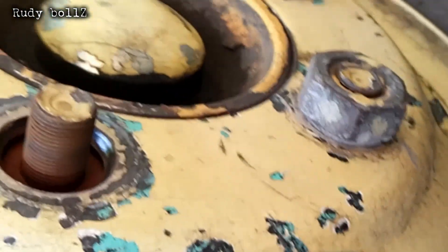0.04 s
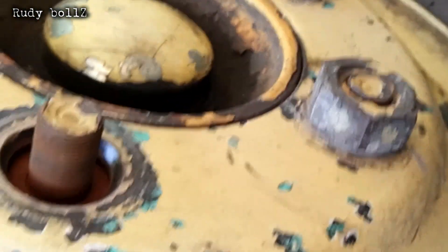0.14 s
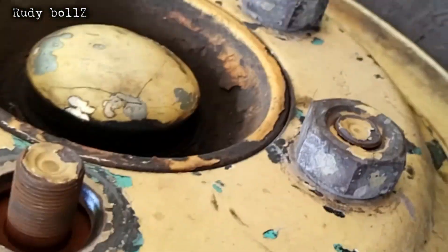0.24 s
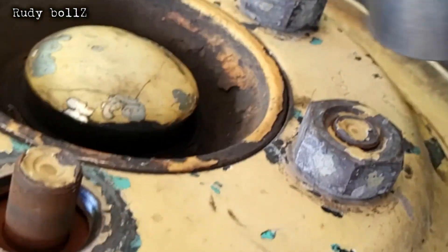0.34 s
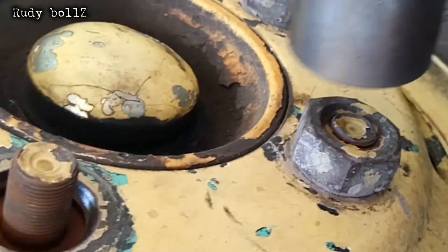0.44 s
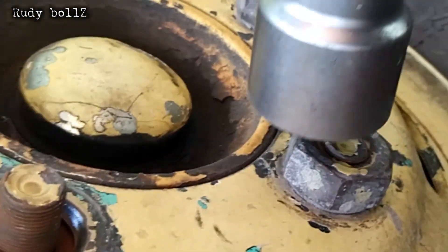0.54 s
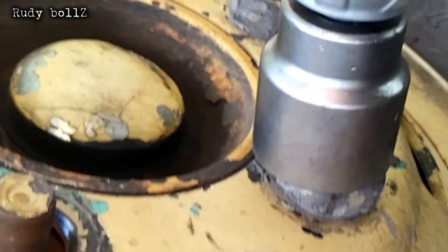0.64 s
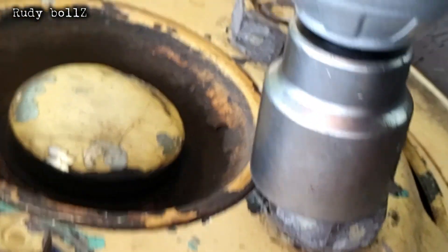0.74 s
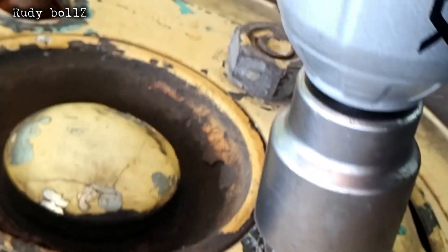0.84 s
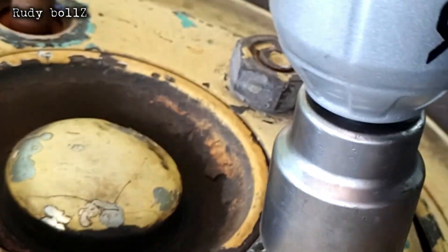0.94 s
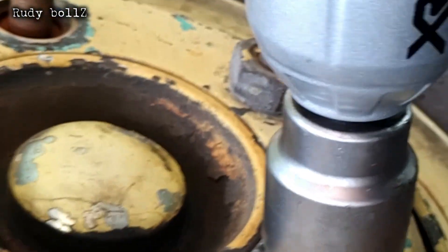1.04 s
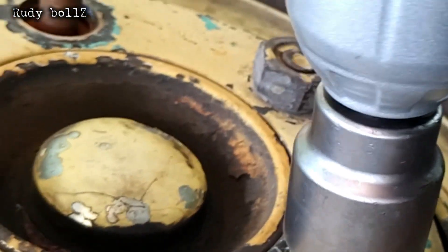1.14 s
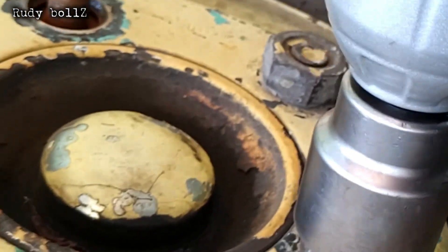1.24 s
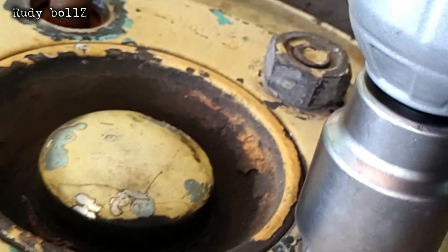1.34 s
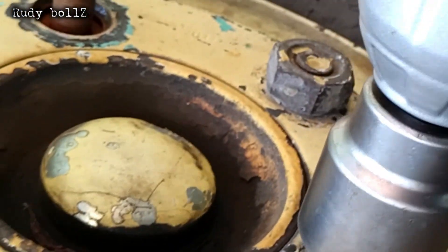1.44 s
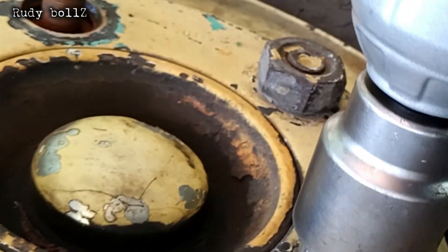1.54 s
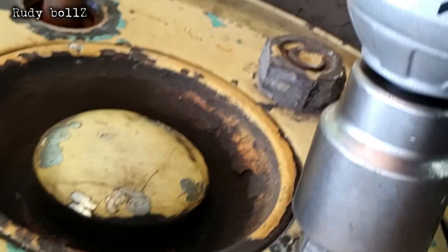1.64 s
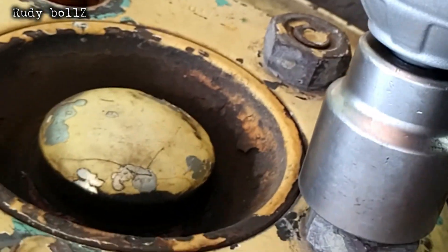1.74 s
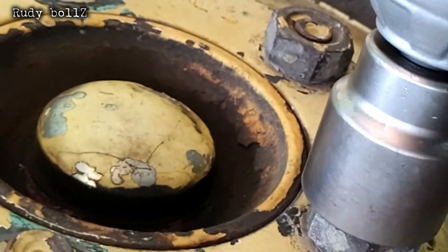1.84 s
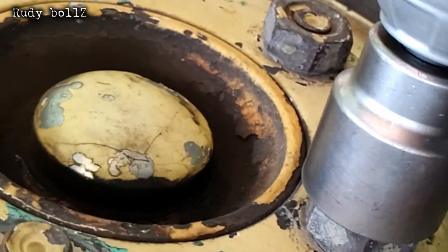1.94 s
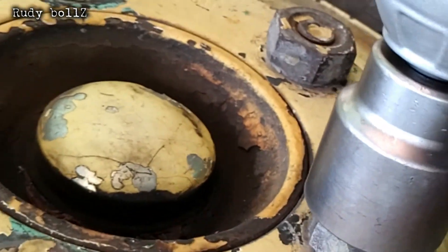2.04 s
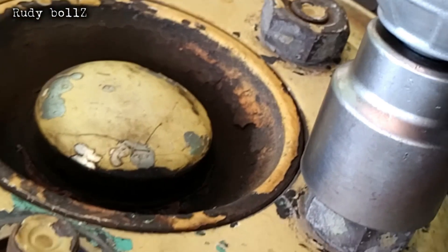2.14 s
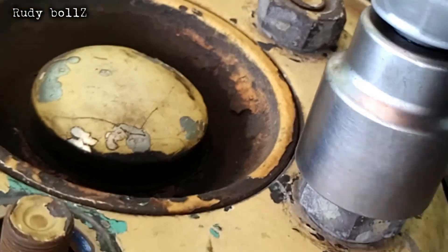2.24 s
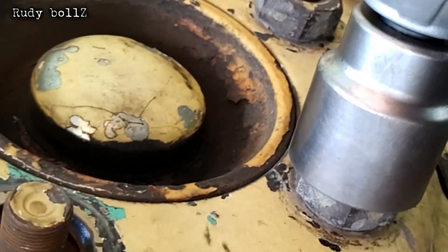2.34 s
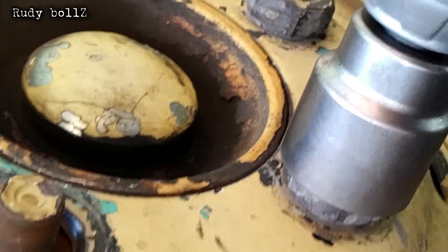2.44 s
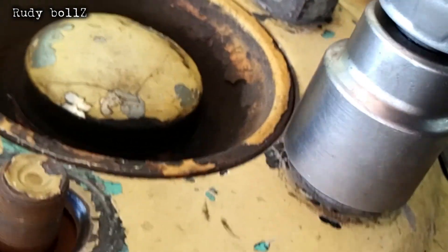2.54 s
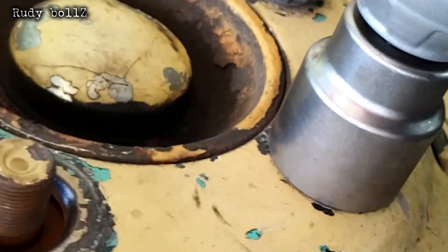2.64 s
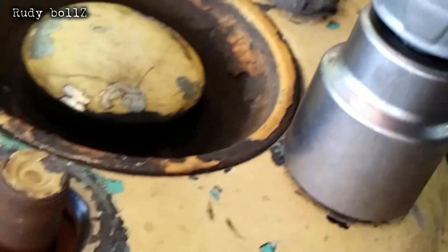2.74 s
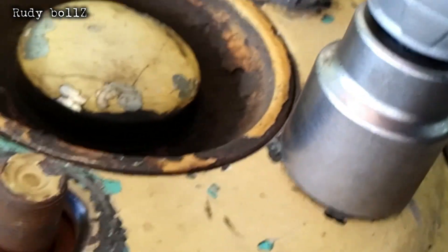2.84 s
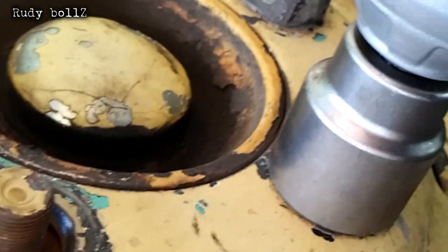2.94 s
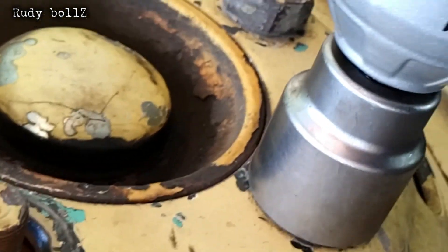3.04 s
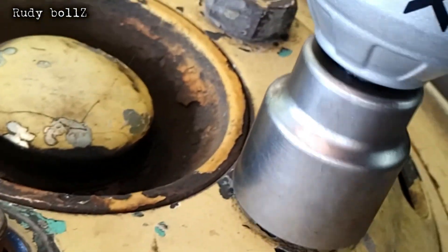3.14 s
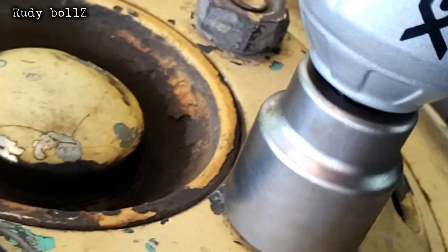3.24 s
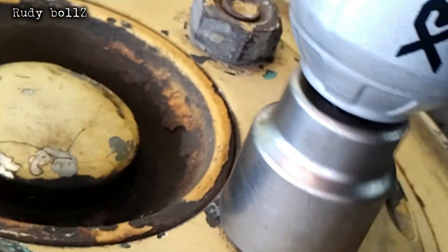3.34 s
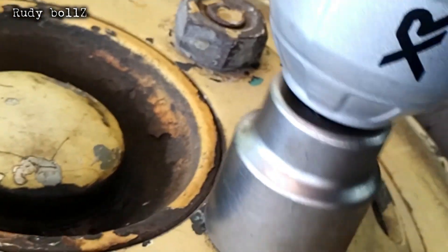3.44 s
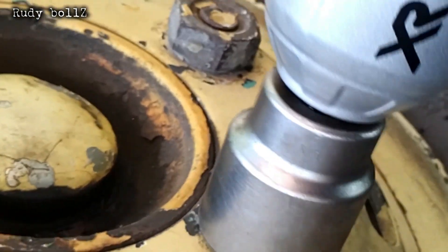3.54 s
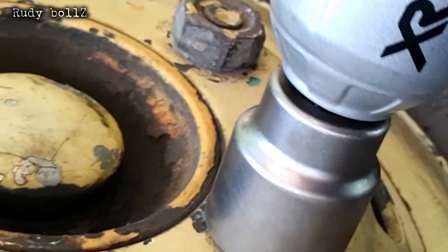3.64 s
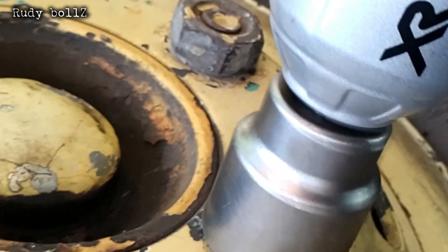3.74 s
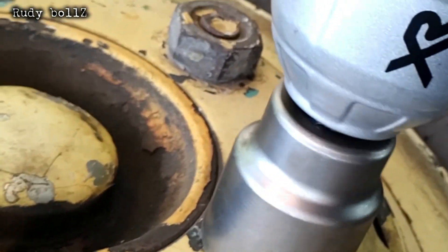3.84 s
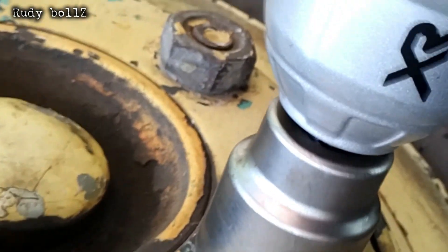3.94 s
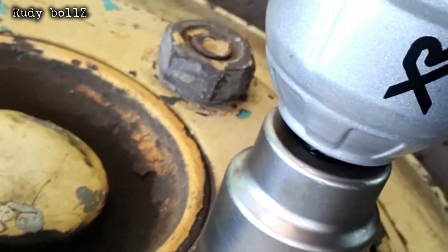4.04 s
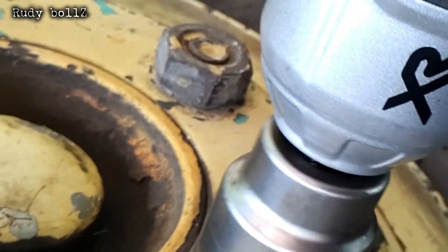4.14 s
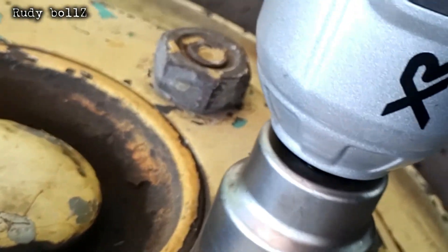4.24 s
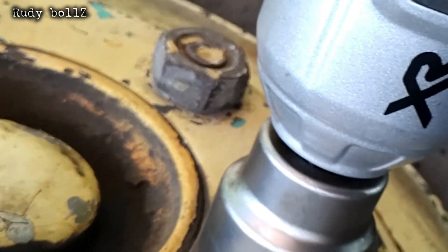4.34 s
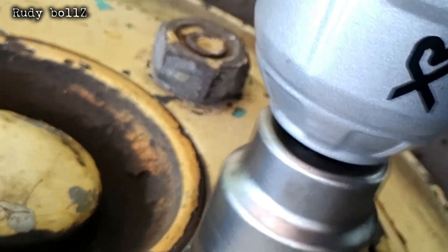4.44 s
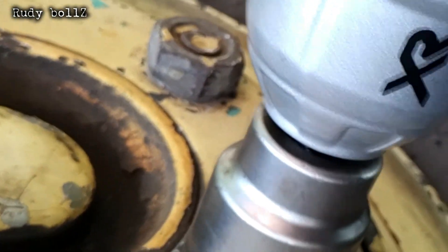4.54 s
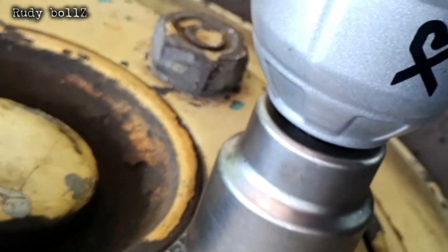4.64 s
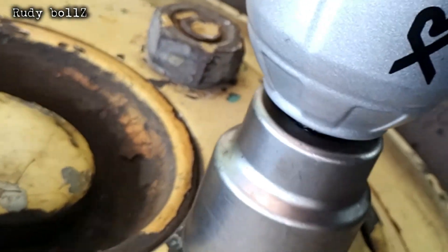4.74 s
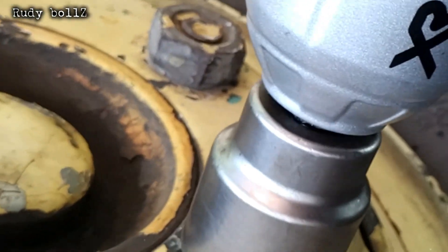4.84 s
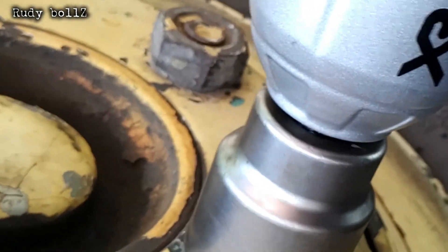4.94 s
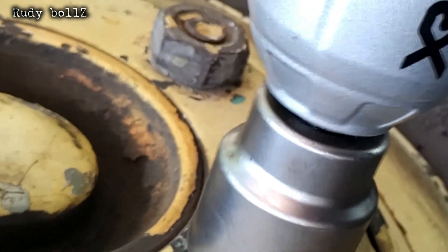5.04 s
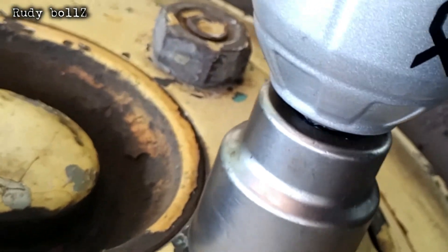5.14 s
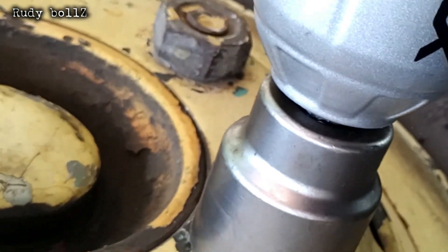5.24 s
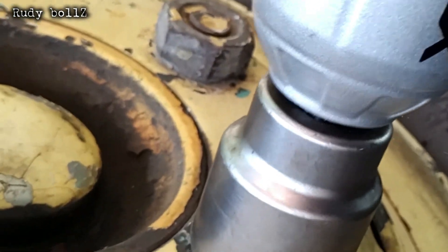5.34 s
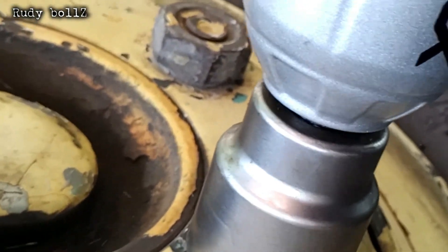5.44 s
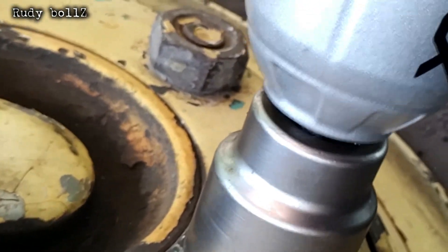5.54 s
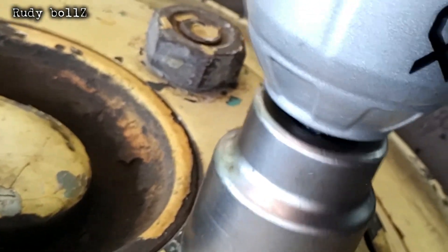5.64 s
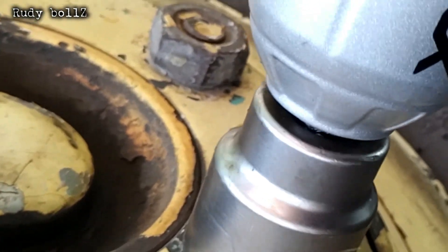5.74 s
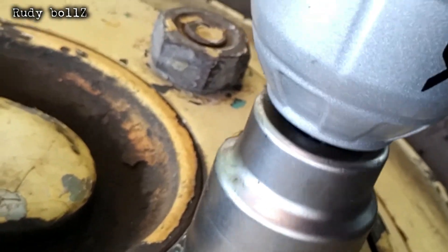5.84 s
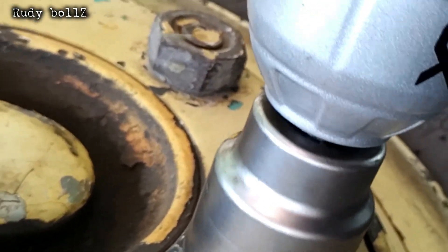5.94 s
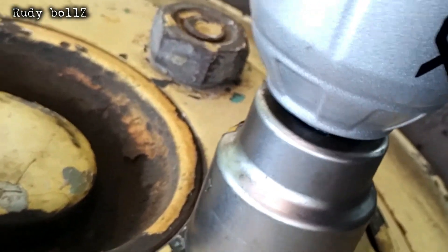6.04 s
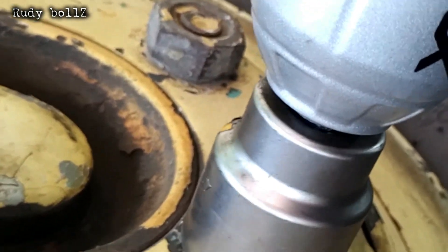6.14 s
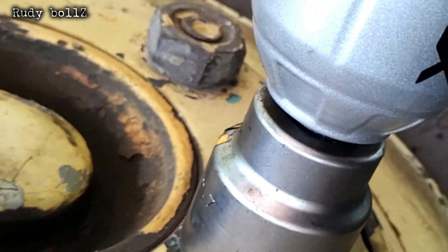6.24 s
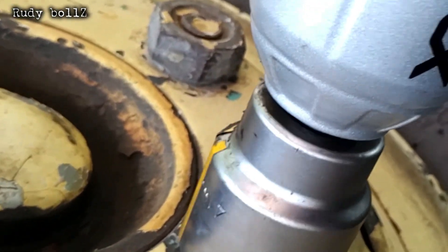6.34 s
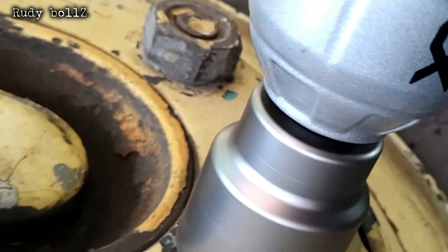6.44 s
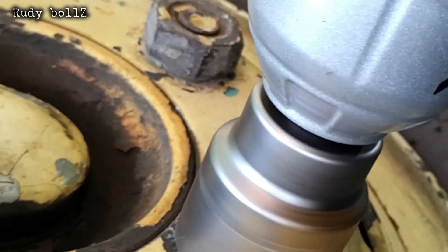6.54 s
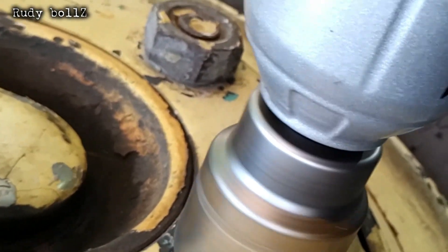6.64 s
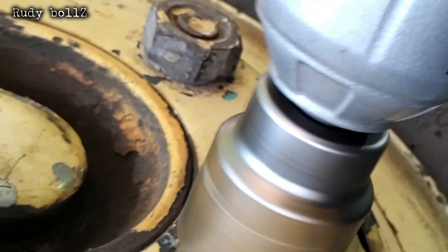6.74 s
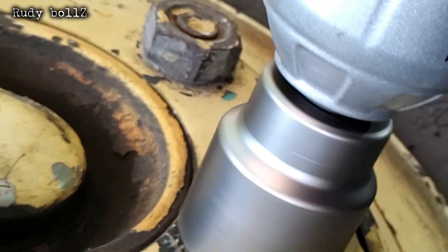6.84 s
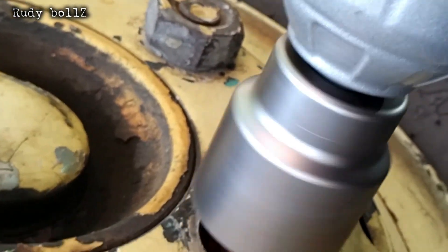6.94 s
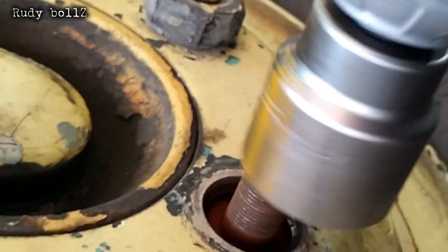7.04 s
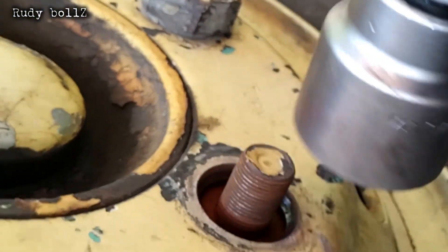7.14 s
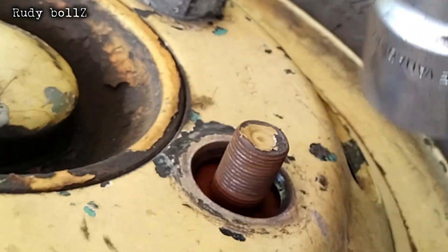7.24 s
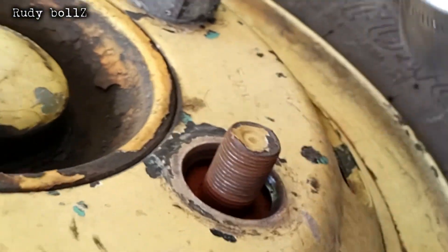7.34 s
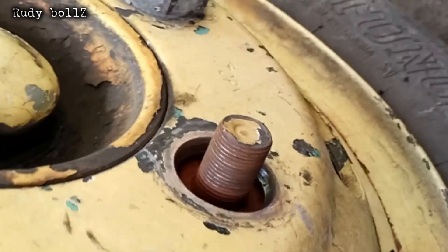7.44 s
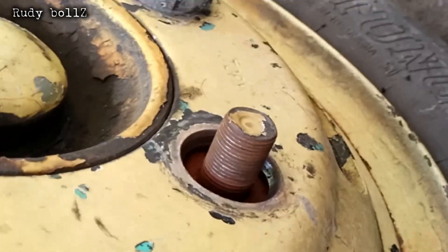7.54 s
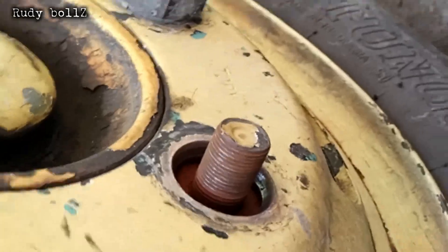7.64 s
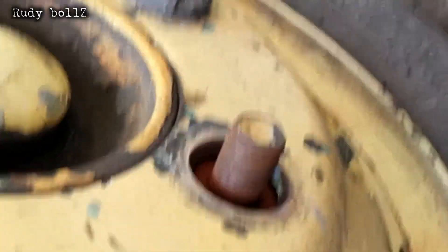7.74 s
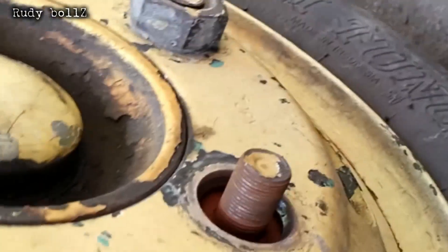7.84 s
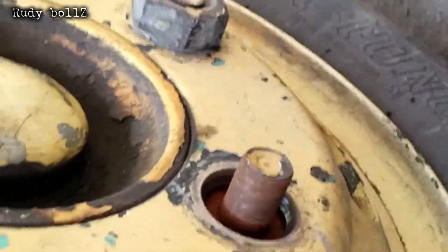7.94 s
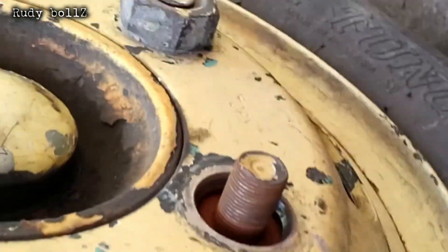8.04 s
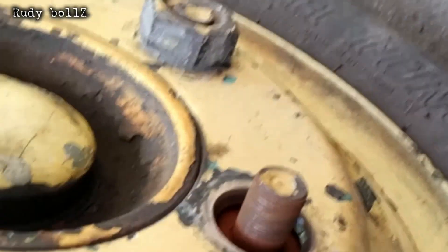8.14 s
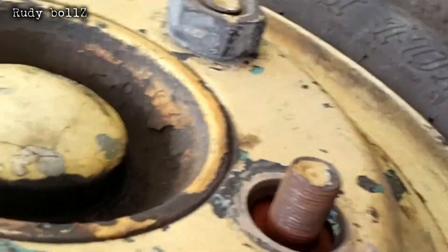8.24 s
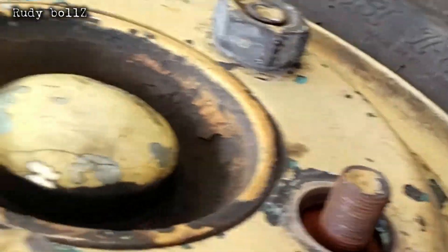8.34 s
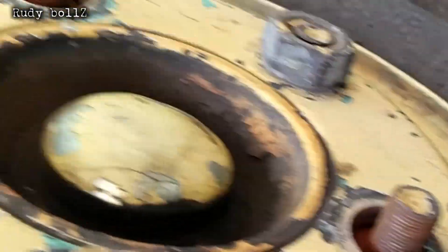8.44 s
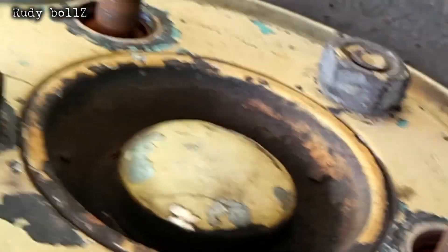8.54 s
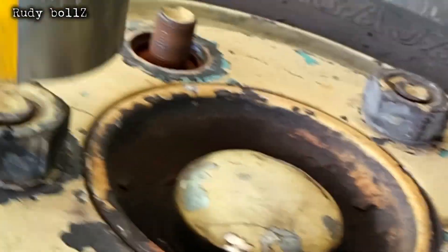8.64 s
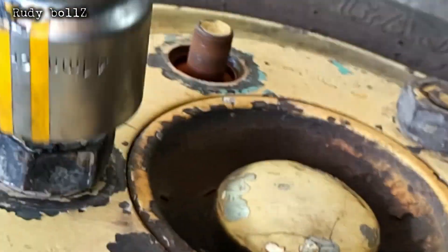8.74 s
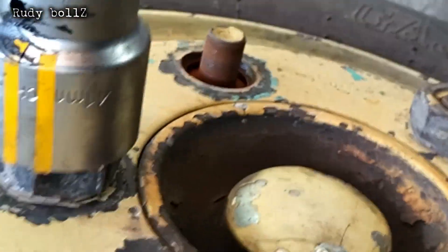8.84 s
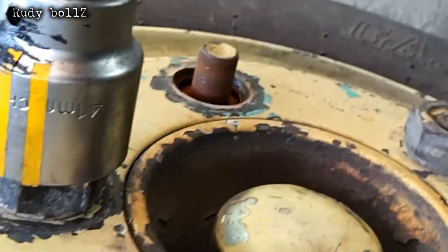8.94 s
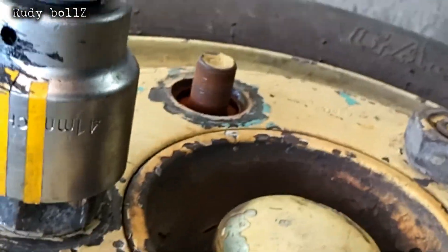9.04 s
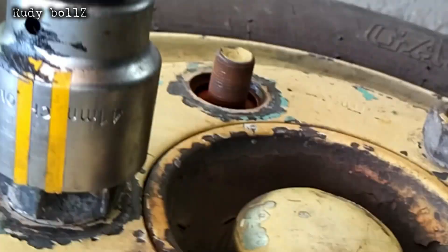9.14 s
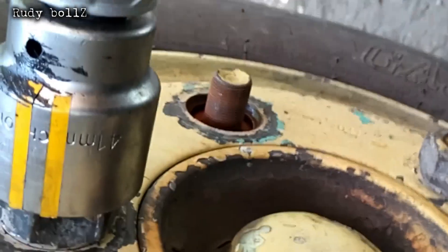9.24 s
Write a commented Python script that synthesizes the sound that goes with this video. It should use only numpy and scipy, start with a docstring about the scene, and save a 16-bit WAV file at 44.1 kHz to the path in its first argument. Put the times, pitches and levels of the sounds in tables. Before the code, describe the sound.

After light metallic clinks, rapid harsh impacts clatter on a big wheel nut; it breaks loose, whirrs off its thread and leaves quiet yard noise.

```python
"""A cordless impact wrench undoes a large nut on a steel wheel close by: about 42 blows a second set decaying
modes of socket and nut and bursts of coloured noise ringing, and overload the microphone. Before and after,
the socket clinks and squeaks on steel. Once free, the nut rasps up its thread as motor and gears race, then
coast down in falling glides. Far off, a tonal engine drones and two notes hum over noise-made traffic and hiss."""
import sys
import numpy as np
from scipy import signal
from scipy.fft import rfft, irfft, next_fast_len
from scipy.io import wavfile
from scipy.ndimage import map_coordinates

SR = 44100
rng = np.random.default_rng(int(sys.argv[2]) if len(sys.argv) > 2 else 0)


def dump(signal):
    """Clip the signal to [-1, 1] and save it as 16-bit WAV at the path in sys.argv[1]."""
    limited = np.clip(np.atleast_2d(signal).T, -1, 1)
    pcm = np.round(limited * 32767).astype(np.int16)
    wavfile.write(sys.argv[1], SR, pcm)


N = 409688


def amp(db):
    """Level to amplitude: 20 dB is a factor of ten."""
    return 10 ** (np.asarray(db) / 20)


def unit(x):
    """Normalisation to an rms of 1."""
    return x / np.sqrt(np.mean(x ** 2) + 1e-20)


def along(points, hz):
    """Interpolation of (Hz, value) points on a logarithmic frequency axis."""
    point_hz, value = np.transpose(points)
    return np.interp(np.log(hz + 1), np.log(point_hz + 1), value)


def clock():
    """Sampling: the time of every sample in seconds."""
    return np.arange(N) / SR


def curves(rows):
    """Linear interpolation in time of each column after the first."""
    s, *columns = np.transpose(rows)
    return [np.interp(clock(), s, column) for column in columns]


def wobble(rate):
    """Band-limited fluctuation: a smooth random curve with rate knots a second."""
    knots = rng.standard_normal(int(N * rate / SR) + 4)
    return map_coordinates(knots, [clock() * rate])


def filtered(x, response):
    """Linear filtering: the spectrum of x times a frequency response."""
    n = x.shape[-1]
    padded = next_fast_len(n + 8192)
    return irfft(rfft(x, padded) * response(np.fft.rfftfreq(padded, 1 / SR)), padded)[..., :n]


# Left-right coherence of all noise. Each row: frequency in Hz, correlation of the channels (1 is mono).
COHERENCE = [(40, 0.33), (150, 0.97), (500, 0.25), (1500, 0.09), (8000, 0.014)]


def noise(spectrum, size=N, ripple_db=0):
    """Partly coherent stereo noise of rms 1 from independent mid and side; crowded resonances ripple it."""
    def split(hz):
        angle = np.arccos(np.clip(along(COHERENCE, hz), -1, 1)) / 2
        return amp(along(spectrum, hz)) * [np.cos(angle), np.sin(angle)]

    def ripple(hz):
        bumps = np.interp(hz, grid_hz, rng.standard_normal(len(grid_hz)))
        return amp(ripple_db * hz / (hz + 600) * bumps)

    mid, side = filtered(rng.standard_normal((2, size)), split)
    grid_hz = np.arange(0, SR / 2, 45)
    return unit(np.array([filtered(port, ripple) for port in (mid + side, mid - side)]))


def shifting(x, depth_db, width_hz, life_s):
    """Time-varying filtering: resonances of this width come and go in x; the result has rms 1."""
    hz, t, z = signal.stft(x, SR, nperseg=1024 if width_hz < 300 else 256)
    where = np.array(np.meshgrid(hz / width_hz, t / life_s, indexing="ij"))
    knots = rng.standard_normal((int(hz[-1] / width_hz) + 2, int(t[-1] / life_s) + 2))
    gain = amp(depth_db * map_coordinates(knots, where, order=2))
    return unit(signal.istft(z * gain, SR)[1][:, :N])


def ringing(modes, t, scatter_db, detune):
    """Modal decay of struck steel: the grip shifts the modes, and each port hears its own phases."""
    hz, db, t60 = np.transpose(modes)[:, :, None]
    hz = hz * (1 + detune * rng.standard_normal(hz.shape) / t60)  # the most damped modes shift most
    decay_db = db + scatter_db * rng.standard_normal(hz.shape) - 60 * t / t60
    partials = amp(decay_db) * np.exp(2j * np.pi * hz * t)
    phases = np.exp(2j * np.pi * rng.random((2, len(hz))))
    return (phases @ partials).real


def pan(db):
    """Intensity stereo: gains of two channels that differ by db, the left one louder if positive."""
    return amp([[db / 2], [-db / 2]])


def add(track, s, sound):
    """Superposition: mixes a sound into the track from time s."""
    part = track[:, round(s * SR):][:, :sound.shape[-1]]
    part += sound[..., :part.shape[-1]]


# Background level, offset for each layer. Each row: time in seconds, level in dB.
YARD_LEVEL = [(0, -50), (.6, -52.5), (1.3, -54.5), (2.3, -50.5), (3.1, -49.5), (7.4, -63), (7.85, -62.5),
              (8.55, -59.5), (9.29, -58.5)]
# The far engine. Each row: time in seconds, mean firing rate in Hz, level of the fundamental in dB.
ENGINE = [(0, 67, -55), (.8, 66, -48.5), (1.2, 65.15, -51), (1.7, 63.1, -46), (2.15, 64.9, -44),
          (2.35, 70.5, -38.5), (3.15, 70, -42), (7.4, 71.96, -59), (9.29, 60, -57.5)]
# Its overtones. Each row: multiple of the firing rate, mean level in dB over the background.
OVERTONES = [(2, -7.5), (2.5, -3), (3, -11.5), (5, -10.5), (5.5, -11)]
# Noise spectra of rumble, traffic, hiss and a faint steady rush.
# Each row: frequency in Hz, relative density in dB per Hz.
RUMBLE = [(12, -53), (20, -4), (65, 1.5), (79, -3.5), (97, -5.5), (161, -3), (276, -10), (352, -14),
          (398, -18), (500, -28.5), (650, -46), (1100, -120)]
TRAFFIC = [(210, -29), (350, -4.5), (385, -6.5), (673, -8), (758, -11), (1210, -11.5), (1810, -17.5),
           (6000, -26), (7800, -55.5), (13200, -120)]
HISS = [(2350, -36), (4000, -12), (5730, -8), (7060, -5), (9660, 1.5), (11800, -10.5), (12700, -15),
        (15100, -25), (16000, -25.5)]
RUSH = [(700, -15), (1400, -3), (1900, -0.5), (2400, -2.5), (3000, -12), (6000, -24.5)]
RUMBLE_DB, HISS_DB, RUSH_DB = -10.5, -3.5, -70
RUMBLE_FOLLOW = .73  # dB of rumble for each dB of background


def yard():
    """Superposed far sources: a harmonic engine drone over filtered noise for traffic, rumble and hiss."""
    level_db, = curves(YARD_LEVEL)
    firing_hz, engine_db = curves(ENGINE)
    angle = 2 * np.pi * np.cumsum(firing_hz * (1 + 0.00798 * wobble(12))) / SR
    overtones = sum(amp(db + 3 * wobble(5)) * np.sin(k * angle) for k, db in OVERTONES)
    engine = amp(engine_db) * np.sin(angle) + amp(level_db) * overtones
    rumble_db = RUMBLE_DB + RUMBLE_FOLLOW * level_db + 1.9 * wobble(7)
    rumble = amp(rumble_db) * noise(RUMBLE)
    moving = shifting(noise(TRAFFIC), depth_db=2.5, width_hz=60, life_s=.4)
    traffic = amp(level_db + 0.49 * wobble(1.7)) * moving
    hiss = amp(level_db + HISS_DB) * noise(HISS)
    rush = amp(RUSH_DB) * noise(RUSH)
    return engine + rumble + traffic + hiss + rush


# Two notes of a far machine. Each row: mean frequency in Hz, relative mean level in dB.
HUM_NOTES = [(482, 0), (667, -3)]
HUM_DB = -14  # settled level over the background
HUM_FADE_DB, HUM_FADE_S = 18.5, .26  # extra level at the start, and the time constant of its fall


def hum():
    """Random frequency and amplitude modulation makes two far sine tones waver."""
    notes = 0
    for hz, db in HUM_NOTES:
        phase = 2 * np.pi * np.cumsum(hz * (1 + .012 * wobble(40))) / SR
        notes = notes + amp(db + 2 * wobble(9)) * np.sin(phase)
    fade_db = HUM_FADE_DB * np.exp(-clock() / HUM_FADE_S)
    return amp(curves(YARD_LEVEL)[0] + HUM_DB + fade_db) * notes


# Decay of the reflections. Each row: frequency in Hz, time to fall 60 dB in seconds.
ROOM_DECAY = [(200, 0.18), (2000, .16), (8000, 0.075), (15000, 0.093)]


def room(x):
    """Diffuse reflection: tyre and nearby surfaces answer as a convolution with decaying noise."""
    hz, t, z = signal.stft(rng.standard_normal((2, SR // 3)), SR, nperseg=256)
    decay = amp(-60 * t / along(ROOM_DECAY, hz)[:, None])
    tail = signal.istft(z * decay, SR, nperseg=256)[1]
    return signal.fftconvolve(x, tail / np.linalg.norm(tail[0]), axes=1)[:, :N]


# The socket sliding lightly on steel; the last row is its ring lingering after the strike at 8.88 s. Each row:
# start in seconds, length in seconds, first and last centre frequency in Hz, level in dB.
SLIDES = [(2.228, 0.076, 3436, 3450, -53), (2.646, .03, 7400, 7900, -43), (2.758, 0.063, 7400, 7550, -50),
          (3.095, 0.067, 3450, 3460, -46.5), (6.473, .048, 7620, 7460, -12),
          (6.532, 0.037, 2600, 2480, -32), (7.71, .08, 7100, 7250, -63), (7.87, .14, 7200, 7210, -64.5),
          (8.42, 0.21, 6780, 7050, -60), (8.63, .17, 7160, 6950, -62), (8.9, .058, 7250, 7260, -46)]
HOARSE = 0.013  # modulation cutoff as a share of the first frequency


def slides():
    """Friction squeal: sliding contact excites one resonance, a carrier modulated by slow noise; a lingering
    ring is made the same way."""
    out = np.zeros((2, N))
    for s, length, from_hz, to_hz, db in SLIDES:
        n = round(length * SR)
        phase = 2 * np.pi * np.cumsum(np.linspace(from_hz, to_hz, n)) / SR
        lowpass = lambda hz: 1 / (1 + 1j * hz / (HOARSE * from_hz))
        a, b = filtered(rng.standard_normal((2, 2, n)), lowpass)
        squeak = unit(a * np.cos(phase) + b * np.sin(phase))
        add(out, s, amp(db) * np.sqrt(np.hanning(n)) * squeak * pan(3))
    return out


# Low thuds as the tool jolts and the spinning socket wobbles.
# Each row: start in seconds, frequency in Hz, initial level in dB.
JOLTS = [(0.035, 400, -38), (2.2995, 24, -23), (2.334, 24, -28.5), (6.628, 330, -30.5), (6.77, 150, -26),
         (6.828, 201, -30), (6.866, 220, -30.5), (6.943, 130, -30), (6.964, 190, -28), (7.084, 24, -11),
         (7.2, 24, -22), (8.887, 200, -36)]


def jolts():
    """Damped oscillation: each jolt is one low sine that dies exponentially."""
    out, t = np.zeros((2, N)), np.arange(SR // 4) / SR
    for s, hz, db in JOLTS:
        add(out, s, -amp(db) * np.sin(2 * np.pi * hz * t) * amp(-60 * t / 0.046))
    return out


# The socket touching nut and stud. Each row: start in seconds, clink level in dB, clink centre in Hz,
# knock, ring and disc levels in dB, contact time constant in seconds.
CLINKS = [(0.0258, -30, 7200, -38.5, -55, -44, .0015), (0.094, -37, 8100, -47, -53, -64, .0016),
          (0.7255, -30, 7290, -45, -38, -60, .0022), (0.7281, -22, 7600, -27, -28, -38, .0026),
          (1.581, -56, 8030, -41, -66, -60, .002), (2.2955, -32, 8700, -42, -50, -60, .002),
          (2.2988, -13.5, 8700, -23.5, -36.5, -42, .0018), (2.3105, -14, 8900, -31, -43, -50, .0014),
          (2.3192, -20, 8800, -35, -48, -54, .0011), (2.3318, -19, 8250, -24.5, -36, -38, .003),
          (2.341, -27, 8400, -31, -43.5, -43, .002), (2.35, -38, 8400, -40, -50, -48, .008),
          (2.378, -42, 8200, -44, -54, -54, .007), (2.425, -37.5, 8000, -40, -55.5, -54, .003),
          (2.667, -38, 7600, -46, -48, -62, .002), (2.673, -23.5, 8900, -22, -44, -42, .0011),
          (3.137, -33, 7600, -29, -35, -36, .008), (6.529, -11, 8250, -31.5, -23.5, -52, .0012),
          (7.083, -8, 8300, -26, -26, -44, .0013), (7.0915, -19, 8000, -29, -23, -46, .0016),
          (7.1378, -24, 8700, -30, -44, -50, .0013), (7.152, -28, 8700, -37, -44, -56, .0012),
          (7.156, -28, 7800, -35, -45, -56, .0012), (7.169, -30, 7200, -45, -44, -62, .0012),
          (7.1755, -20.5, 6760, -36, -45, -58, .0009), (7.196, -29, 8200, -44, -48, -62, .0015),
          (7.1997, -9, 8140, -30, -21, -53, .0014), (7.206, -21, 8000, -32, -29, -56, .002),
          (7.2455, -29, 7600, -40, -48, -58, .0012), (7.2485, -25, 7200, -29, -47.5, -56, .0012),
          (7.268, -26, 7200, -36, -48, -54, .0011), (7.2715, -30, 9000, -37, -50, -56, .0012),
          (7.29, -41.5, 8600, -49, -58, -62, .0025), (8.0501, -21.5, 8700, -31.5, -52, -50, .00096),
          (8.0505, -32, 5250, -44, -56, -60, .0011), (8.8802, -26, 7800, -30, -25, -44, .0021),
          (8.885, -27, 8200, -26.5, -33, -34, .0022), (8.945, -53, 9400, -48, -65, -50, .004),
          (9.001, -51, 3080, -60, -70, -66, .0012)]
# Clink spectrum. Each row: multiple of the clink centre, relative density in dB per Hz.
CLINK_SPECTRUM = [(.3, -26.5), (.6, -16.5), (.8, -12.5), (0.899, -4), (1, 1.5), (1.15, -6.5), (1.35, -12),
                  (1.6, -24), (2, -29)]
# Knock spectrum. Each row: frequency in Hz, relative density in dB per Hz.
KNOCK_SPECTRUM = [(70, -8), (160, 2.5), (600, -5), (1400, -2.5), (2400, 3.5), (3600, -3.5), (5400, -4),
                  (9000, -3.5), (15500, -22.5)]
# Modes of the socket, and of the wheel disc when knocked.
# Each row: nominal frequency in Hz, mean level in dB, time to fall 60 dB in seconds.
SOCKET = [(4334, -19, .11), (4613, -18, .13), (7150, -3.5, .09), (7245, -1.5, .08), (7335, -1.5, .05),
          (7480, -4, .035), (8100, -14, .08), (8530, -13, .1), (8787, -17, .16), (14880, -12.5, .13)]
DISC = [(175, 0, .1), (320, -5, .05), (580, -2.5, .13), (670, -6, .07), (1200, -1.5, .05), (1863, -7, .035),
        (2280, -5, .04), (3000, -11, .04)]
CLINK_SIDE_DB = 3.5  # the socket is left of the microphone


def clinks():
    """Impact excitation: a brief scrape of steel, a knock in the wheel, and ringing socket and disc modes."""
    out, t = np.zeros((2, N)), np.arange(SR // 4) / SR
    mouth = [mode for mode in SOCKET if 7000 < mode[0] < 7400]
    for s, clink_db, centre_hz, knock_db, ring_db, disc_db, length in CLINKS:
        contact = t / length * np.exp(1 - t / length)  # the faces bite, then let go
        colour = [(ratio * centre_hz, db) for ratio, db in CLINK_SPECTRUM]
        scrape = amp(clink_db) * noise(colour, size=len(t))
        knock = amp(knock_db) * noise(KNOCK_SPECTRUM, size=len(t))
        ring = amp(ring_db) * ringing(mouth, t, scatter_db=2.5, detune=.0001)
        disc = amp(disc_db) * ringing(DISC, t, scatter_db=3, detune=0.0006)
        onset = 1 - np.exp(-t / length)
        add(out, s, (contact * (scrape + knock) + (ring + disc) * onset) * pan(CLINK_SIDE_DB))
    return out


# How hard the loose nut rasps on the thread. Each row: time in seconds, level in dB.
THREAD = [(6.51, -27), (6.6, -22.5), (6.8, -19.5), (6.88, -22), (7.0, -28.5), (7.08, -33), (7.17, -41),
          (7.27, -56), (7.35, -80)]
# Noise spectra of rasp and gears. Each row: frequency in Hz, relative density in dB per Hz.
RASP = [(2060, -40), (3500, -21.5), (3850, -18), (4810, -14), (5290, -7.5), (8910, 0), (11000, -7.5),
        (12900, -18.5), (15400, -20.5), (16000, -24.5)]
GEARS = [(120, -24), (200, -7), (629, -5.5), (806, -10), (1050, -3), (1450, -1), (1750, -3), (2450, 1),
         (4500, -1), (5850, -40), (9900, -120)]
# Whine of motor and gears. Each row: multiple of the motor rate, mean level in dB at full speed off resonance.
WHINE = [(2, -47), (3, -50), (8, -52), (11, -49), (16, -56)]
FREE_S, RELEASE_S, HALT_S = 6.51, 6.9, 7.31  # the nut breaks free, the trigger is let go, the motor stands
LOADED_HZ, FREE_HZ, RUN_UP_S = 330, 526, .1  # turns per second under load and free; time constant between
CASE_HZ, CASE_WIDTH_HZ, CASE_DB = 3480, 195, 22  # gear case resonance; its peak adds to a gain of 1
GEAR_DB, HANDLING_DB = -32, -38.5  # mean levels at full speed
GEAR_GROWTH, HANDLING_GROWTH = 2.8, 1.7  # powers of the speed


def case_gain(hz):
    """Resonance: the gear case amplifies each multiple as it falls through its band."""
    return 1 + amp(CASE_DB) * np.exp(-((hz - CASE_HZ) / CASE_WIDTH_HZ) ** 2)


def free_spin():
    """Rotation-locked sound: thread rasp, gear noise and whine follow the motor's run-up and coast-down."""
    t = clock()
    driven_hz = FREE_HZ + (LOADED_HZ - FREE_HZ) * np.exp(-np.maximum(t - FREE_S, 0) / RUN_UP_S)
    motor_hz = driven_hz * np.clip((HALT_S - t) / (HALT_S - RELEASE_S), 0, 1)  # friction brakes it evenly
    speed = motor_hz / FREE_HZ
    running = np.clip((t - FREE_S) / 0.044 + .5, 0, 1)
    angle = 2 * np.pi * np.cumsum(motor_hz * (1 + .006 * wobble(90))) / SR
    rattle = amp(0.56 * wobble(350) + 1.4 * np.sin(angle))
    scraping = shifting(noise(RASP, ripple_db=1.5), depth_db=2.2, width_hz=120, life_s=.06)
    rasp = amp(curves(THREAD)[0]) * unit(rattle * scraping) * pan(7.9)
    tones = 0
    for k, db in WHINE:
        tone = np.sin(k * angle + rng.normal(0, 1, (2, 1)))
        tones = tones + amp(db + 1.5 * wobble(80)) * case_gain(k * motor_hz) * tone
    coasting = np.clip((t - RELEASE_S) / .05, 0, 1)  # the unloaded gears sing once the trigger is let go
    whine = coasting * speed * tones
    gears = amp(GEAR_DB + .8 * wobble(120)) * speed ** GEAR_GROWTH * noise(GEARS, ripple_db=1.5)
    lurch = amp(HANDLING_DB + 3.5 * wobble(25)) * speed ** HANDLING_GROWTH
    rumble = lurch * noise([(15, 2.5), (35, -11), (100, -8), (220, -17.0), (500, -38.0), (2000, -66.5)])
    return running * (rasp + (gears + whine) * pan(2) + rumble)


# Spectrum of the small contacts. Each row: frequency in Hz, relative density in dB per Hz.
TICK_SPECTRUM = [(300, -12), (700, -3), (1500, -5), (3200, -3), (4500, 2), (6500, 0), (10000, 0),
                 (15000, -6)]
START_S, STOP_S = 3.153, 6.488  # first and last moment of hammering
TICKS_PER_S, TICK_DB, TICK_SPREAD_DB = 330, -27, 4  # mean rate, level of the whole train, scatter of each


def ticks():
    """Random impact train: jaws, anvil and socket chatter in their slack as dense, tiny noise bursts."""
    out, t = np.zeros((2, N)), np.arange(SR // 200) / SR
    steel = noise(TICK_SPECTRUM)
    count = round(TICKS_PER_S * (STOP_S - START_S))
    for place, size in zip(rng.random(count), rng.standard_normal(count).clip(max=2)):
        s = START_S + place * (STOP_S - START_S)
        burst = steel[:, round(s * SR):][:, :len(t)]
        add(out, s, amp(TICK_SPREAD_DB * size - 60 * t / .004) * burst)
    return amp(TICK_DB) * out / np.std(out[:, round(START_S * SR):round(STOP_S * SR)])


BLOW_HZ, CREEP_HZ_PER_S = 41.04, .42  # the hammer creeps faster as the nut gives
LAG_HZ, SPIN_UP_S = 5.8, .06  # initial shortfall of the rate, and the time constant of its recovery


def blow_times():
    """Phase accumulation: a blow falls at each whole turn of the hammer's rising rate."""
    age = np.arange(round((STOP_S - START_S) * SR)) / SR
    rate_hz = BLOW_HZ + CREEP_HZ_PER_S * age - LAG_HZ * np.exp(-age / SPIN_UP_S)
    turns = np.cumsum(rate_hz) / SR
    return START_S + np.searchsorted(turns, np.arange(turns[-1])) / SR


KICK_HOLD_S, KICK_UNEVEN = .016, .36  # median time a kick pushes; scatter of it on a natural-log scale


def kick_push(t, ports, lag, shove):
    """Pressure step: each kick holds for an uneven time, and the two ports feel it a little apart."""
    since = np.maximum(t - .0006 * np.abs(1 + lag + ports), 0)
    hold = KICK_HOLD_S * np.exp(KICK_UNEVEN * (shove + ports))
    return np.exp(-(since / hold) ** 2) * (1 - np.exp(-since / .0005))


# How freely the socket rings on the nut; it is damped while it binds.
# Each row: time in seconds, mean play in dB.
PLAY = [(3.16, -1), (3.3, -3), (3.5, -4.5), (3.65, -2), (3.86, -5), (3.98, 3), (4.36, 1.5), (4.44, -1.5),
        (4.5, 2.5), (4.68, -1.5), (4.77, 3), (5.21, -.5), (5.3, 1.5), (5.5, 3.5), (5.62, -1), (5.76, 2.5),
        (6.22, 0), (6.41, -6.5), (6.49, 1)]
# Modes of the nut while tight on its stud.
# Each row: nominal frequency in Hz, mean level in dB, time to fall 60 dB in seconds.
NUT = [(8530, 0, .15), (8790, 1, .25), (8900, -3, .15), (9076, -4, .15), (9324, -3.5, .15), (9776, -3, .15),
       (9943, -3, .2)]
# How strongly the nut rings; it dulls once it starts to turn. Each row: time in seconds, level in dB.
TIGHT = [(3.16, -35), (3.4, -23), (3.88, -23), (4.0, -30.5), (6.49, -33.5)]
# Spectra of nut and anvil chattering in the socket, and of the dense ring of wheel and hammer case.
# Each row: frequency in Hz, relative density in dB per Hz.
CHATTER = [(2000, -27), (6500, -14.5), (7600, -0.5), (8350, -4), (8800, -1.5), (10000, -2), (11200, -9.5),
           (13000, -30), (16000, -23)]
WHEEL = [(150, -23.5), (400, -11), (700, -10), (1130, -9.5), (1500, -11), (2500, -8), (3200, -5.8),
         (3900, -7), (4800, -3), (6600, -2.5), (8000, -5.5), (12000, -6.5), (15500, -8)]
RING_DB, CHATTER_DB, WHEEL_DB = -9.7, -10.7, -13  # socket and nut at middling play; wheel
CHOKE_DB = 13  # ring lost when the next blow lands
CHATTER_TRADE = 0.32  # dB of chatter lost for each dB of play
ROCK_DB, ROCK_HZ = 0.94, 12  # the tool rocks in the hand: scatter of the play, knots per second
STIFFEN = .005  # share by which the socket's mouth rings higher for each dB of negative play
KICK_DB, KICK_BUILD_S = -15.2, 0.11  # hub shaking: level, and time constant of its build-up


def hammer():
    """Repeated impact excitation: blows crack, kick the hub and ring socket, nut and wheel, no two alike."""
    play_db = curves(PLAY)[0] + ROCK_DB * wobble(ROCK_HZ)
    times = blow_times()
    t = np.arange(SR // 8) / SR
    ring, nut, kick, power = np.zeros((2, N)), np.zeros((2, N)), np.zeros((2, N)), np.zeros((3, N))
    decay = amp(-60 * t / np.array([[.008], [.13], [.19]]))  # crack, chatter, wheel
    # the next blow presses the socket against the nut and chokes its ring
    choke = amp(-CHOKE_DB * np.clip((t - 1 / BLOW_HZ) / .003 + 1, 0, 1))
    held = choke[SR // 90:]  # a bounce is nearer to that blow
    chances = rng.standard_normal((len(times), 9))
    for s, (late, force, bite, left, right, slack, rebound, shove, lag) in zip(times, chances):
        build = 1 - np.exp(-(s - START_S) / KICK_BUILD_S)
        sharp = 1 + STIFFEN * max(0, -play_db[round(s * SR)])
        modes = [(hz * sharp if 7000 < hz < 7800 else hz, db, t60) for hz, db, t60 in SOCKET]
        s += .00012 * late
        struck = ringing(modes, t, scatter_db=2.0, detune=.00055) * (1 - np.exp(-t / 0.001))
        add(ring, s + .0025, amp(2.4 * bite) * choke * struck)
        add(nut, s, ringing(NUT, t, scatter_db=2.5, detune=.0001))
        strength_db = np.array([[2.8 * force], [-2.2 * bite], [1.3 * force]])
        add(power, s, (amp(strength_db) * decay) ** 2)
        # the loose socket bounces back against the nut about halfway to the next blow
        bounce = s + .0115 + .003 * slack
        add(power, bounce, (amp(-3.5 - 2 * rebound) * decay * [[.7], [1], [1]]) ** 2)
        again = ringing(modes, t[:len(held)], scatter_db=2.5, detune=.0007)
        add(ring, bounce, amp(-5.5 + 3.3 * rebound) * held * again)
        ports = np.array([[left], [right]])
        add(kick, s, build * amp(2.5 * (force / 3 + ports)) * kick_push(t, ports, lag, shove))
    crack, chatter, wheel = np.sqrt(power)  # overlapping decays add as power
    rattle = shifting(noise(CHATTER), depth_db=2.0, width_hz=895, life_s=.024)
    # what does not ring the socket rattles the nut
    steel = amp(RING_DB + play_db) * ring + amp(curves(TIGHT)[0]) * nut
    steel += amp(CHATTER_DB - CHATTER_TRADE * play_db) * chatter * rattle
    # the wheel's colour shifts in fine and in broad bands
    wheel_ring = shifting(noise(WHEEL, ripple_db=1.0), depth_db=3.4, width_hz=65, life_s=.07)
    body = amp(WHEEL_DB) * wheel * shifting(wheel_ring, depth_db=1.0, width_hz=800, life_s=.012)
    snap_noise = noise([(100, -9.5), (400, 7), (1100, -3), (1600, -10), (4000, -10), (9000, -6), (15000, -3)])
    snap = amp(-17) * crack * snap_noise
    shake_noise = noise([(10, 6.0), (30, -5.5), (70, -4.0), (160, -15), (600, -16.0), (2000, -50.5)])
    shake = amp(-25) * wheel * shake_noise
    kick = filtered(kick, lambda hz: 1j * hz / (1j * hz + 5))  # high-pass at 5 Hz
    thump = amp(KICK_DB) * kick * pan(-2.1)
    return steel * pan(1.8) + body + ticks() + snap + shake + thump


def scene():
    """Superposition of the far yard, the touches with their reflections, and the wrench at the wheel."""
    touches = clinks() + jolts() + slides()
    background = yard() + hum()
    return background + touches + amp(-10) * room(touches) + free_spin() + hammer()


TOP_HZ = 15780  # middle of the cutoff slope


def record(dry):
    """Saturation: the overloaded microphone flattens peaks; a band limit then cuts the extremes."""
    ceiling = amp(-4.5)
    squashed = dry / (1 + np.abs(dry / ceiling) ** 3) ** (1 / 3)

    def band(hz):
        top = np.clip((TOP_HZ - hz) / 200 + .5, 0, 1)
        return top * 1j * hz / (1j * hz + 3)  # high-pass at 3 Hz

    return filtered(squashed, band)


dry = scene()
out = record(dry)
dump(out)
```